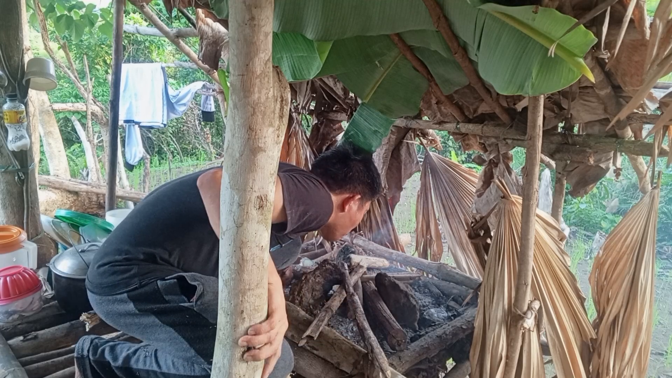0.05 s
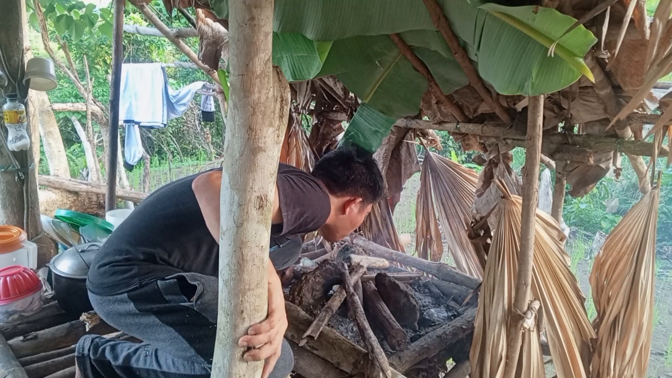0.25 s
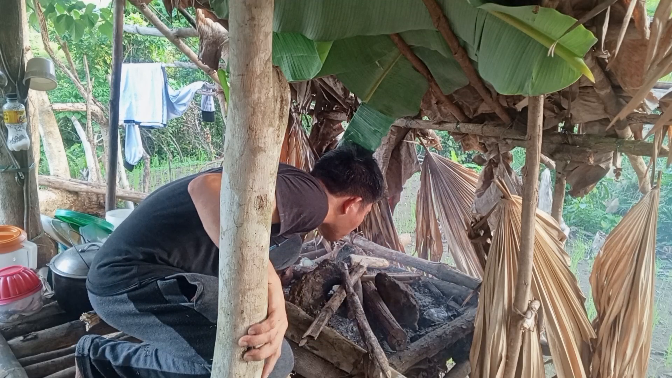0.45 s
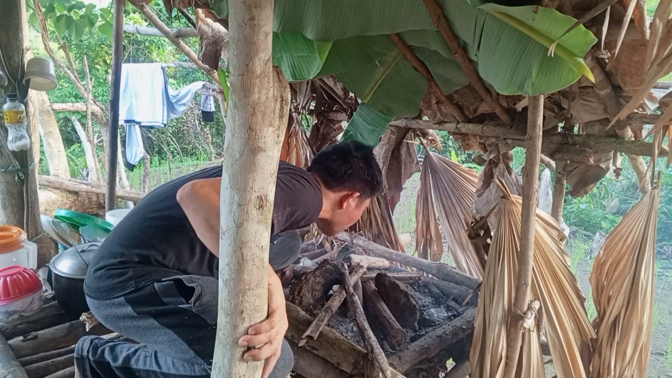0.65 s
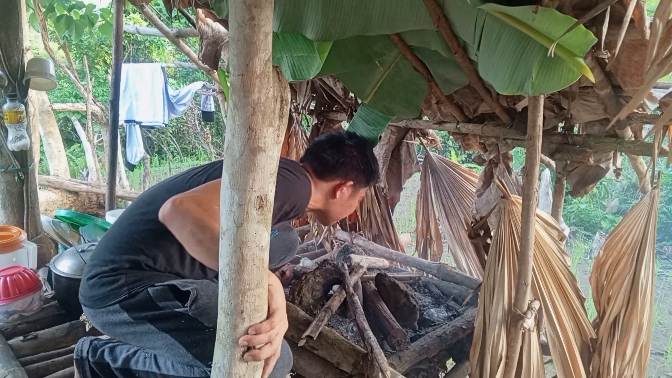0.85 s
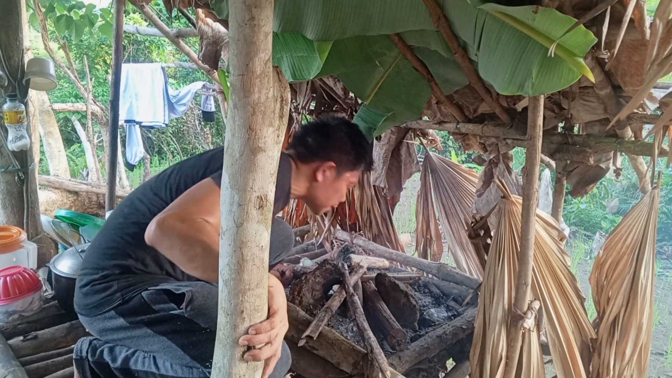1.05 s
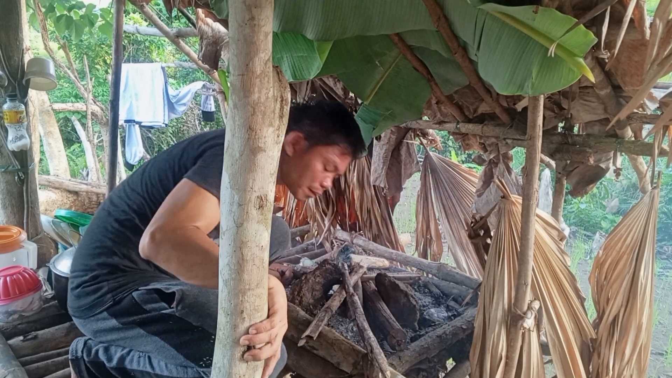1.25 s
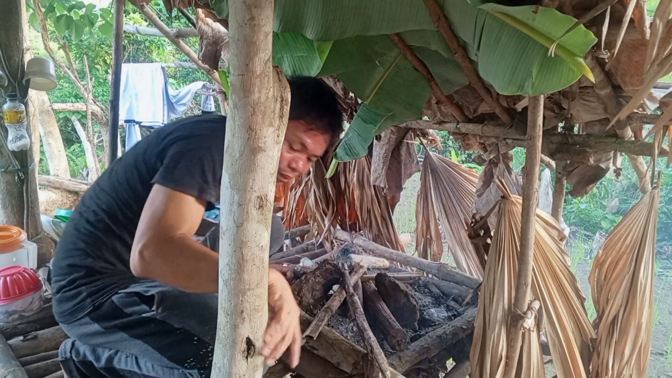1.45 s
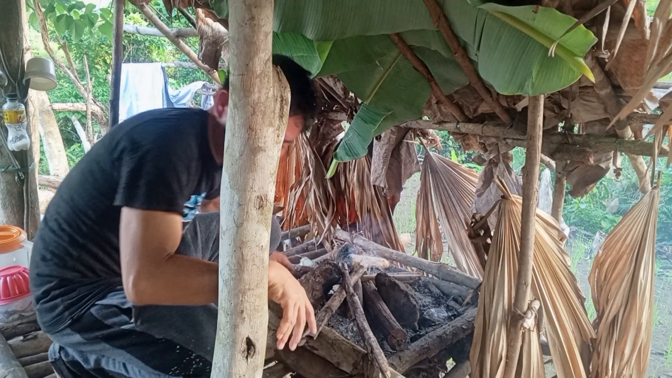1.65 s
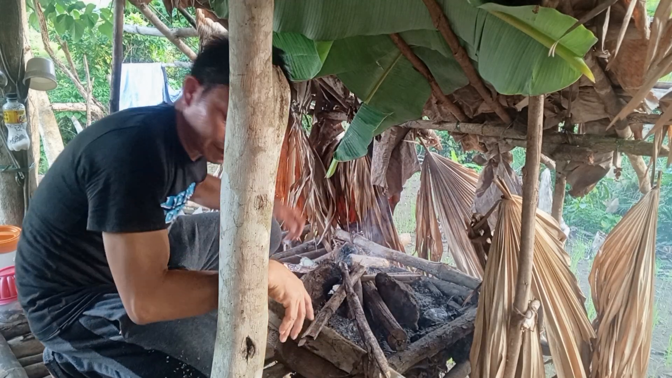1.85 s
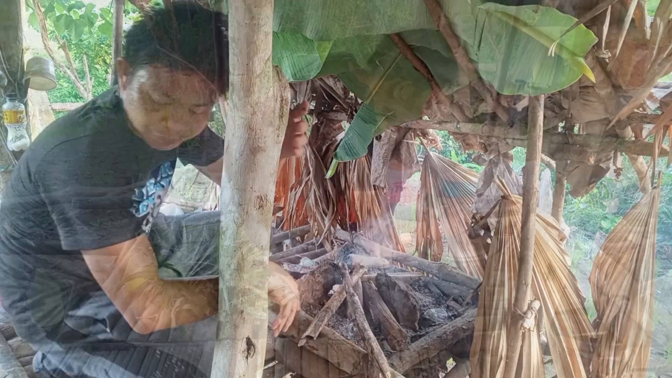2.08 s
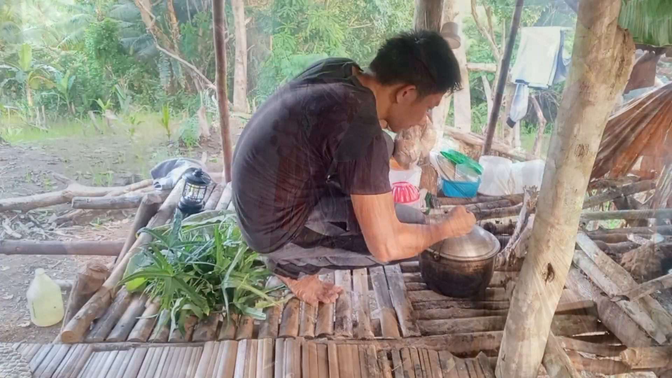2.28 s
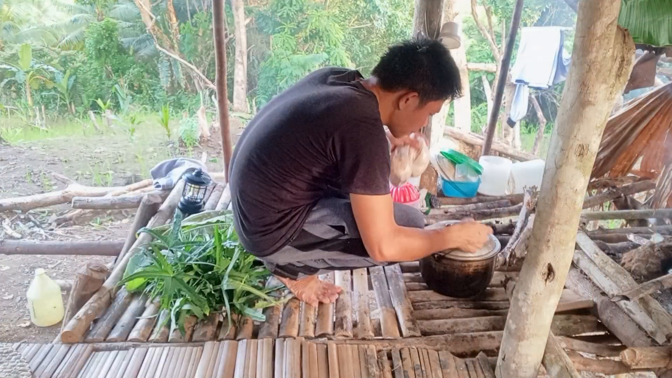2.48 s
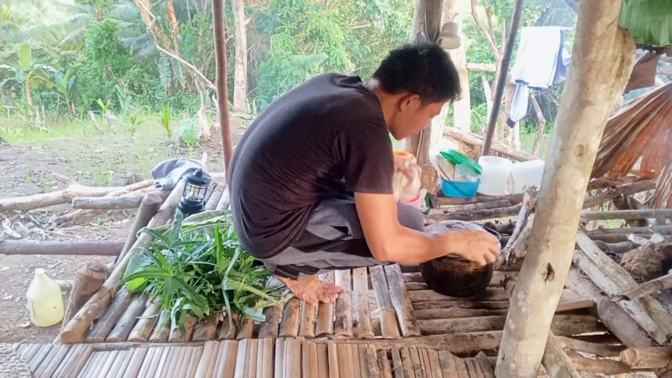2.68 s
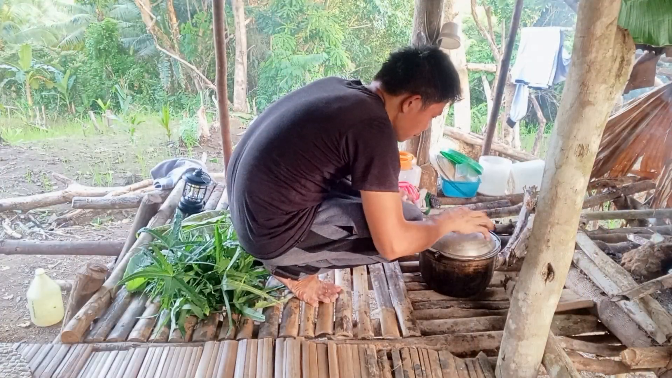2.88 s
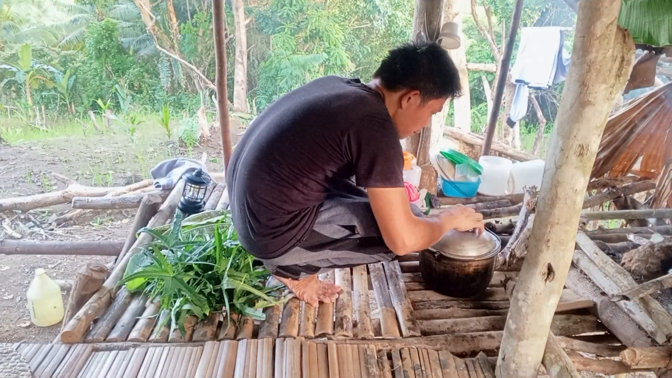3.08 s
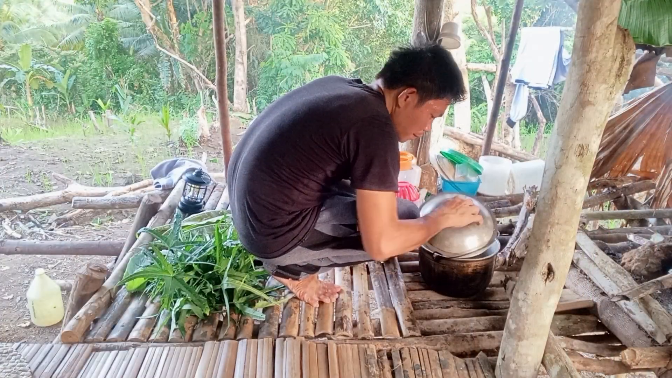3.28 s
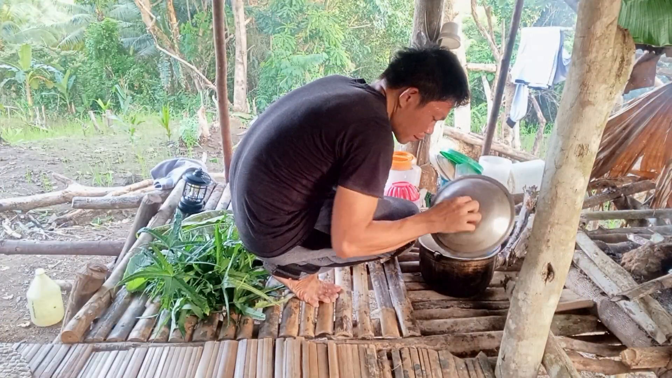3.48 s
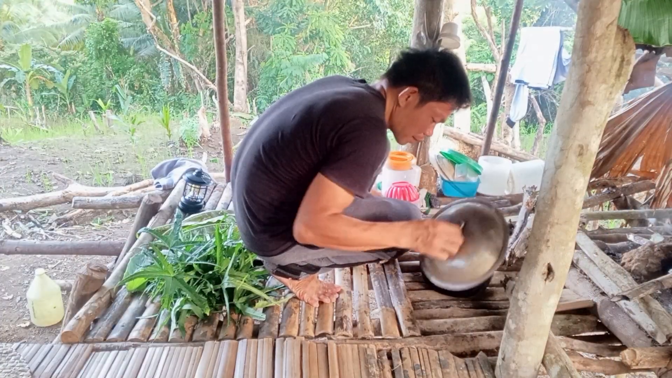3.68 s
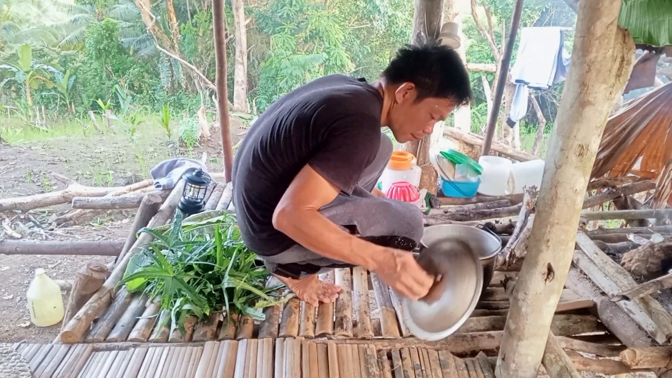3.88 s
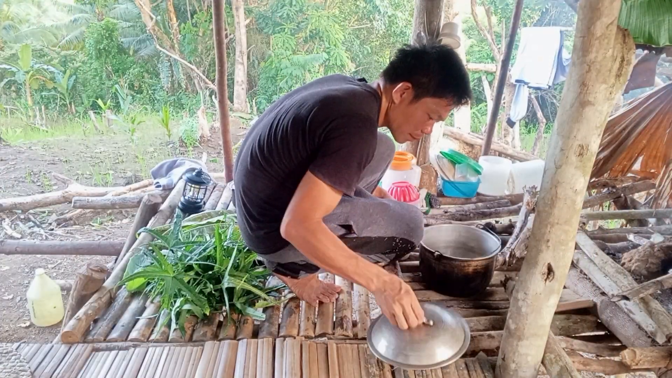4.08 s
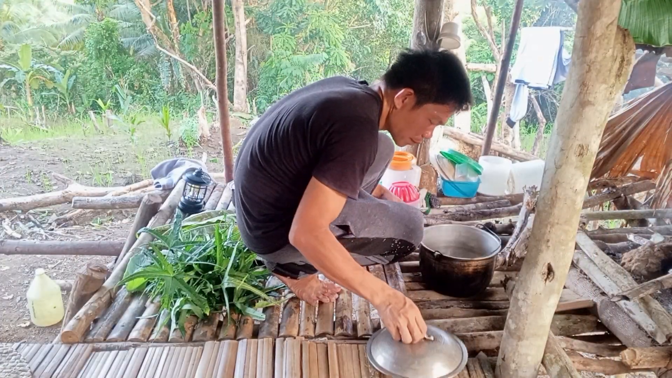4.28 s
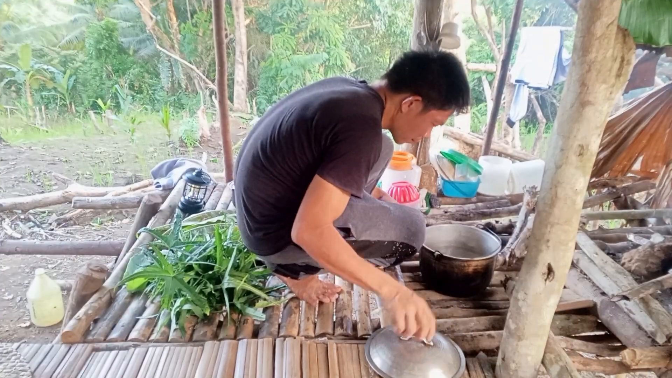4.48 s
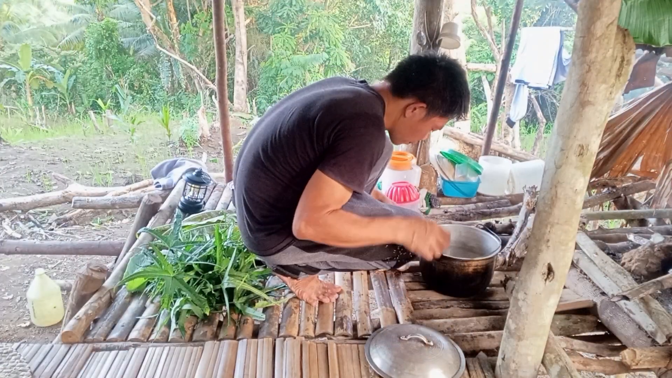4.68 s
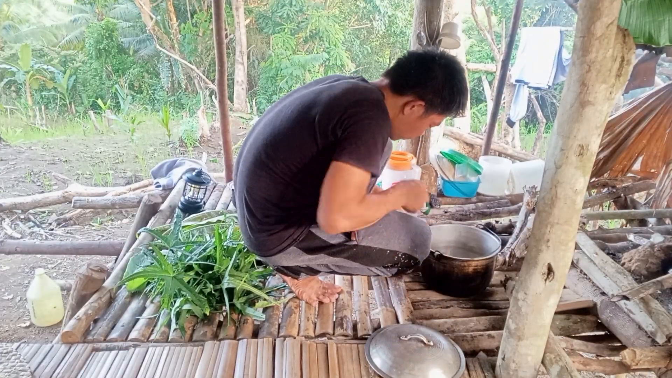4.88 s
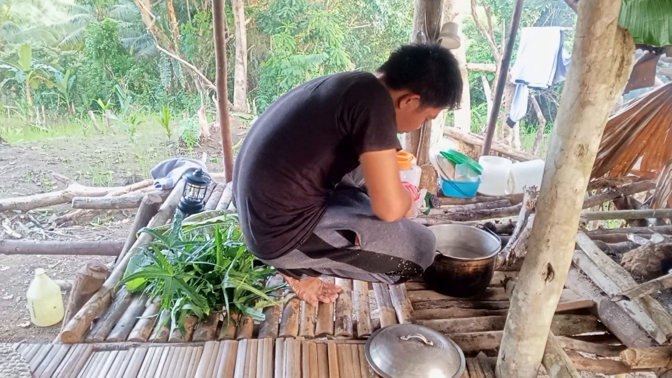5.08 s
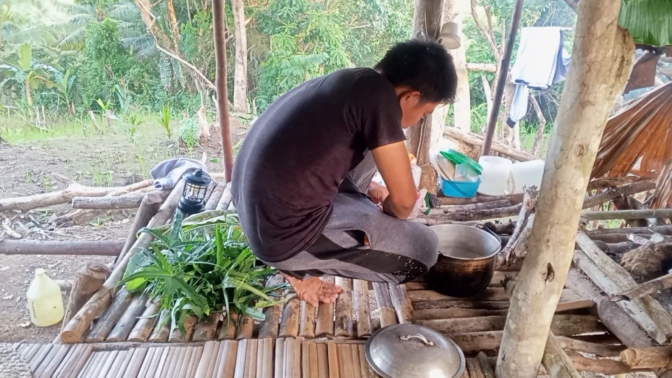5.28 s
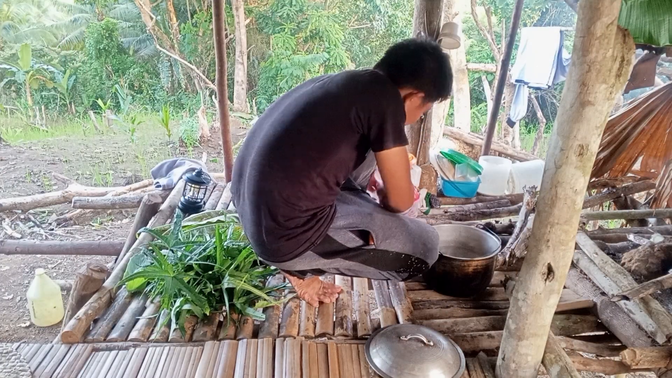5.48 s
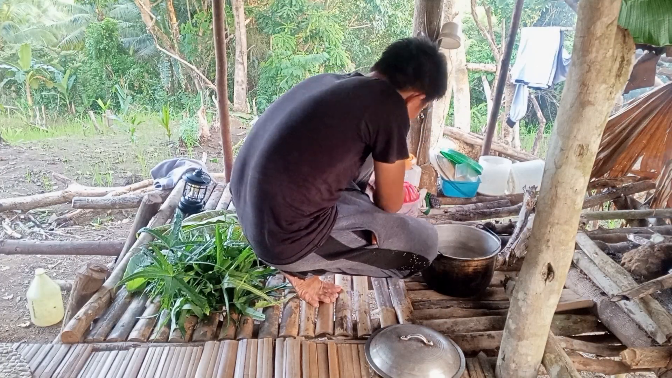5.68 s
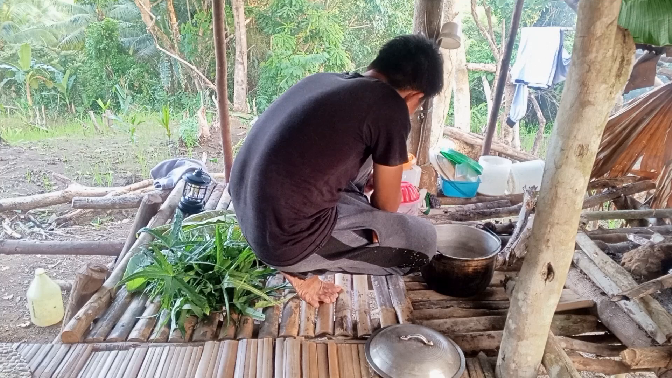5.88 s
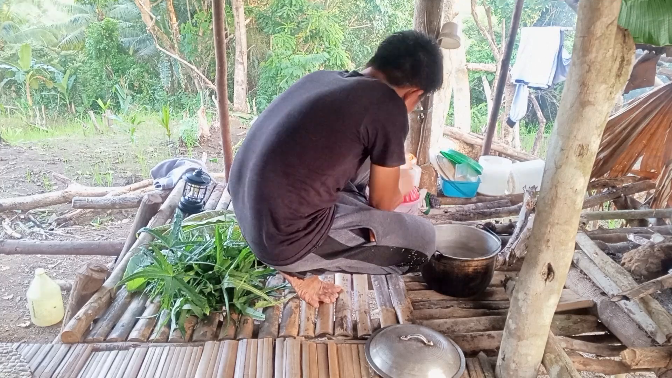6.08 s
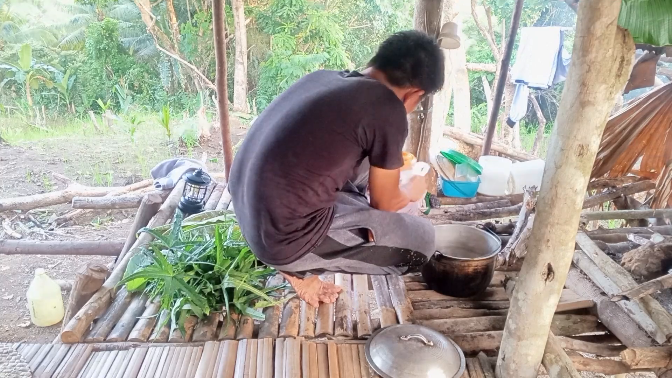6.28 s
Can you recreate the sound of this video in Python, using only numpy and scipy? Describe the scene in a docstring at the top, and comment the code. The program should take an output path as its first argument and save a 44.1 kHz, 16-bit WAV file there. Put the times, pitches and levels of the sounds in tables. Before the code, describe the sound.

A steel pot is set down in a small open forest hut, its lid scrapes and rings, then clatters onto slats amid shrill insects.

```python
"""Insects hiss steadily in the trees around an open forest hut while clothes and hands rustle and bamboo knocks.
Close by, a steel pot is put down; its lid scrapes over the rim, rings in the hand and is laid on the slatted floor.
Steel blows are noise bursts through broad resonances plus dying sine modes; bamboo is the bursts alone.
Insects, air and rubbing are coloured noise, and a small creature's clucks are rounded sine pulses.
The hut adds a short scatter; the microphone loses the deep bass and the top of the treble."""
import sys
import numpy as np
from scipy import signal
from scipy.fft import rfft, irfft
from scipy.io import wavfile
from scipy.ndimage import map_coordinates

SR = 44100
rng = np.random.default_rng(int(sys.argv[2]) if len(sys.argv) > 2 else 0)


def waveform_to_disk(signal):
    """Save audio, clipped to [-1, 1], as 16-bit WAV at the path in sys.argv[1]."""
    frames = np.transpose(np.atleast_2d(signal))
    scaled = np.clip(frames, -1, 1) * 32767
    samples = np.round(scaled).astype(np.int16)
    wavfile.write(sys.argv[1], SR, samples)


N = 279698
TIME = np.arange(N) / SR

# low outdoor air in the forest: (frequency [Hz], relative density [dB per Hz])
FOREST_SPECTRUM = [(20, -35), (40, -16), (65, -8), (105, 3), (170, -3.5), (260, -8.5), (500, -12),
                   (1100, -17), (2000, -18.5), (3500, -19.5), (6500, -24.5), (10000, -27.5), (13000, -41),
                   (16000, -45)]
# insects in the trees: (frequency [Hz], relative density [dB per Hz])
INSECT_SPECTRUM = [(6000, -58), (6900, -19), (7400, 0), (7800, -3), (8250, 3.5), (8600, 0), (9000, -16),
                   (9900, -27.5), (11050, -4.5), (11800, -19.5), (13500, -47)]
FOREST_DB, INSECTS_DB = -58, -57.5
# clucks of a small creature: (time [s], level [dB])
CLUCKS = [(2.572, -46), (2.710, -54), (3.795, -43), (3.806, -45.5), (4.076, -41.5), (4.086, -50),
          (4.269, -44), (5.824, -44.5)]

# dull part of rubbing cloth and hands: (frequency [Hz], relative density [dB per Hz])
SHUFFLE_SPECTRUM = [(40, -22), (110, -0.5), (250, 2), (470, -5), (680, 1.5), (1200, -6.5), (3000, -9),
                    (6000, -15.5), (14000, -33)]
# bright part of the same rubbing: (frequency [Hz], relative density [dB per Hz])
RUSTLE_SPECTRUM = [(100, -38), (450, -10), (900, -7), (1700, -4.5), (2500, -3), (4500, -3), (6500, -3.5),
                   (9000, -2), (10700, 3.5), (12000, -3), (13500, -12), (16000, -22)]
# strokes of a hand or sleeve: (start [s], length [s], rustle [dB], shuffle relative to the rustle [dB])
STROKES = [(-.17, 0.77, -56.5, 4), (1.335, .17, -56.5, -6), (1.64, 0.26, -65.5, 3), (2.34, .29, -55, -17),
           (2.888, .12, -59, -14), (3.68, 0.12, -62, -16), (3.88, 0.48, -53.5, -15), (4.02, 0.11, -53, -20),
           (4.595, 0.17, -48.5, -11), (4.797, 0.2, -55, -7), (5.0, 0.092, -50.5, -18),
           (5.283, 0.28, -46.5, -10), (5.699, 0.13, -43.5, -20), (5.85, 0.14, -45, -14),
           (6.2, 0.091, -41, -16.5)]
STROKE_SKEW, STROKE_POWER = 1.05, 0.55  # fastest a little after midway; loudness follows speed
# spells of steady rubbing, each lasting until the next: (start [s], rustle [dB])
RUBBING_SPELLS = [(0, -78), (2.1, -62.5), (2.7, -70), (2.95, -63), (3.1, -59.5), (4.595, -51.5),
                  (5.53, -54), (6.2, -49)]
SPELL_FADE_S, SPELL_SHUFFLE_DB = .022, -15  # shuffle relative to the rustle

# centres of thud, knock, clank, clash and sizzle: (frequency [Hz])
COLOUR_HZ = [200, 750, 2000, 4800, 10000]
# colour shared by every blow, falling away at both ends: (frequency [Hz], gain [dB])
BLOW_COLOUR = [(30, -27), (70, -13.5), (150, 3.5), (400, 1), (5500, 3.5), (7800, 0.5), (11000, 5),
               (13000, -4), (16000, -28)]
# light knocks and scuffs on wood and bamboo, levels relative: (time [s], scrape length [s], thud [dB],
# peak level [dB], peak centre [Hz], fall to both sides [dB per octave])
KNOCKS = [(1.106, 0.018, -52, -51.5, 5500, 4), (1.195, 0.046, -55, -48, 3200, 9),
          (1.581, .016, -38, -31, 746, 4.5), (1.63, .004, -52, -44, 900, 6.5),
          (2.243, .003, -33, -37, 2000, 10), (2.873, .005, -39, -46.5, 3000, 3.5),
          (3.085, 0.022, -33, -42.5, 2000, 7.5), (3.193, .006, -31, -39, 600, 10),
          (4.205, 0.0048, -50, -35, 1400, 10.5), (4.501, .003, -26, -36, 800, 4.5),
          (4.543, .0045, -25.5, -45, 500, 4.5), (4.82, .004, -56, -36.5, 2200, 2.5),
          (5.608, 0.0031, -37, -32.5, 3940, 7), (6.247, 0.0068, -39, -36, 10000, 1.7)]
# broad resonances of the floor slats: (frequency [Hz], height [dB])
SLAT_RESONANCES = [(160, 3.4), (520, 5.7), (850, 2), (1400, 8.5), (1800, 3.1), (2800, 2.8), (3900, 4.5)]
KNOCK_T60_S = 0.055  # the slats are dead

# free ring of the pot: (frequency [Hz], relative level [dB], t60 [s])
POT_MODES = [(974, -32, .32), (1098, -41, .48), (1528, -44, .4), (1593, -40.5, .52), (2169, -52, .7),
             (2729, -44, .45), (2777, -44.5, .48), (2309, -48, .35), (2600, -47, .35), (3106, -50, .3),
             (3262, -45, .26), (3536, -48, .3), (3676, -48, .3), (4102, -48, .35), (5044, -48, .32),
             (5222, -51, .4), (5824, -51, .35), (5916, -46, .22), (6465, -44, .2), (7413, -49, .25),
             (9722, -45, .18), (10270, -46, .18)]
# free ring of the lid: (frequency [Hz], relative level [dB], t60 [s])
LID_MODES = [(398, -53, 2.2), (780, -60, .6), (1136, -56, 2.1), (2178, -38.5, 1.25), (2616, -53, .5),
             (3483, -42, .33), (4996, -34, .15), (6616, -37, .21), (415, -43, .17), (662, -43, .14),
             (845, -45, .12), (1200, -49, .2), (1500, -49, .3), (2172, -42, .3), (2325, -51, .25),
             (2785, -48, .4), (3165, -48, .2), (3289, -56, .6), (3865, -44, .12), (4441, -48, .15),
             (4581, -47, .18), (5136, -45, .2), (5447, -41, .12), (6105, -46, .1), (7924, -48, .1),
             (9184, -41, .08), (10090, -40, .1)]
# sprung floor under the dropped lid: (frequency [Hz], level [dB], t60 [s])
FLOOR_MODES = [(88.5, -47, .5), (122.4, -46, 0.44), (160.5, -51, 0.44), (256, -54, .3), (347, -44, 0.37)]

# fingers tick on the carried lid, levels relative: (time [s], tick [dB], lid ring [dB])
FINGER_TAPS = [(3.643, -44.5, -17), (3.68, -45, -21), (3.714, -45, -19)]
# soft fingers wake the low modes, thud to sizzle: (relative level [dB])
TAP_RING_COLOUR_DB = [-11, 0, -12, -30, -38]
# broad resonances of the lid in the hand: (frequency [Hz], height [dB])
TAP_RESONANCES = [(1450, 10), (2750, 7)]
TAP_SCRAPE_S, TAP_THUD_DB, TAP_CENTRE_HZ, TAP_FALL_DB_PER_OCTAVE = 0.0028, -45, 2500, 4.0

# the lid meets the floor, levels relative: (time [s], scrape length [s], clatter t60 [s], thud [dB], knock [dB],
# clank [dB], clash [dB], sizzle [dB], lid ring [dB], share of the free ring time [1])
LID_ON_FLOOR = [(4.394, 0.0018, 0.035, -33, -30, -22.5, -22, -43, -4.5, 0.32),
                (4.408, 0.0027, 0.12, -23.5, -25, -14.5, -31, -50, -0.5, 0.87),
                (4.4405, 0.0015, 0.017, -26, -15, -12, -2.5, -26, -14, 0.6),
                (4.4439, 0.0066, 0.068, -21.5, -14.5, -21.5, -17, -33.5, -13, 0.79),
                (4.4818, 0.001, 0.043, -21, -21.5, -27, -21, -48, -20, 0.3)]
# broad resonances of lid and floor in contact: (frequency [Hz], height [dB])
LID_AND_FLOOR = [(158, 9.2), (342, 7), (413, 10.5), (550, 5.4), (658, 10.6), (847, 7.6), (1198, 9.2),
                 (1851, 4.6), (2178, 12.6), (2343, 6.4), (2800, 11), (3302, 6.6), (4579, 9.1), (5039, 6.4),
                 (5674, 2.1), (6614, 2.1), (7703, 7.5), (11082, 9.4)]
LID_RESTS_S, RESTING_T60_S = 4.482, 0.041  # lying flat on the floor, the lid is muted

# the lid hits the rim, levels relative: (time [s], scrape length [s], clatter t60 [s], thud [dB], knock [dB],
# clank [dB], clash [dB], sizzle [dB], pot ring [dB], lid ring [dB], share of the free ring time [1])
LID_ON_RIM = [(2.9338, 0.0037, 0.087, -26, -30, -37.5, -22, -22, -4, -17, 0.2),
              (2.974, 0.002, 0.13, -26, -44, -43, -30.5, -38, -10, -20, 0.35),
              (3.1086, 0.0042, 0.054, -29, -26.5, -37.5, -41, -42.5, -24, -28, 0.24),
              (3.215, 0.0044, 0.096, -44, -45, -41, -27.5, -36, -23, -19, 0.76),
              (3.221, 0.0073, 0.094, -17.5, -22.5, -26.5, -32.5, -50, -4.5, -20, 0.92),
              (3.2647, 0.0047, 0.13, -20.5, -35, -28, -23, -23, -15, 1, 0.93),
              (3.297, 0.02, 0.25, -36, -32, -42, -28.5, -43, -25, -11, 0.36),
              (3.325, 0.0066, 0.088, -21, -15, -22, -34.5, -37.5, -19, -0.5, 0.97),
              (3.351, 0.005, 0.1, -32, -23, -31, -37, -36.5, -27, -12, 0.72),
              (3.386, 0.014, 0.056, -43, -41, -37, -22.5, -33, -18, 0.5, 0.79),
              (3.4844, 0.0083, 0.05, -33, -30, -34, -13.5, -19, 0.5, -16, 0.47),
              (3.526, 0.0051, 0.071, -36, -35, -41, -24, -33.5, -11, -11, 0.34)]
# broad resonances of lid and rim in contact: (frequency [Hz], height [dB])
LID_AND_RIM = [(288, 8.4), (401, 4.7), (490, 6.3), (600, 4.7), (694, 5.6), (1006, 3), (1133, 1.2),
               (1312, 4), (1498, 6.7), (1619, 2.8), (1735, 5.4), (2176, 15.6), (2430, 2.4), (2628, 9.3),
               (3341, 11.6), (3777, 10.5), (4455, 5.6), (5438, 3.7), (5789, 8.5), (6620, 9.5), (7364, 8.1),
               (8315, 2.6), (9133, 3.3), (9758, 9.4), (11137, 5.4)]

# the pot is put down, levels relative: (time [s], scrape length [s], clatter t60 [s], thud [dB], knock [dB],
# clank [dB], clash [dB], sizzle [dB], pot ring [dB], share of the free ring time [1])
POT_DOWN = [(2.067, 0.002, 0.084, -46, -58, -48, -37.5, -35, -33, 0.34),
            (2.0902, 0.0038, 0.053, -15, -23, -26.5, -34, -35, -6, 0.59),
            (2.0969, 0.016, 0.087, -23.5, -21.5, -22, -23.5, -29.5, -1.5, 0.97),
            (2.354, 0.0028, 0.082, -22, -29, -30, -47, -53, -15, 0.96),
            (2.665, 0.0068, 0.057, -38, -45, -44.5, -53.5, -47.5, -17, 0.32)]
# broad resonances of pot and ground in contact: (frequency [Hz], height [dB])
POT_AND_GROUND = [(155, 7), (233, 7.5), (418, 2.5), (545, 3), (700, 9.5), (952, 13.5), (1504, 8),
                  (1723, 11), (2176, 11.5), (2430, 7.5), (2612, 5), (3491, 13.5), (4963, 7), (5765, 11),
                  (6102, -2), (6634, 10), (9817, 6.5), (10758, -1)]

CUTOFF_HZ = 15800


def from_db(db):
    """Turns decibels into an amplitude factor."""
    return 10 ** (np.asarray(db) / 20)


def rms_one(x):
    """Scales a signal to rms 1."""
    return x / np.sqrt(np.mean(x ** 2) + 1e-20)


def at_hz(points, hz):
    """A spectrum in dB, read on a log-frequency axis."""
    points = np.array(points)
    return np.interp(np.log(np.maximum(hz, 1)), np.log(points[:, 0]), points[:, 1])


def dying(t, t60):
    """An envelope that loses 60 dB in t60."""
    return np.exp(-np.log(1000) * t / np.maximum(t60, 1e-3))


def add(out, s, sound):
    """Mixes a sound in from a given time."""
    start = int(round(s * SR))
    out[start:start + len(sound)] += sound[:N - start]


def wander(axis, step):
    """Smooth chance along an axis, with a new value at every step; rms 1."""
    knots = axis / step
    values = rng.standard_normal(int(knots[-1]) + 2)
    return rms_one(map_coordinates(values, [knots], order=2, mode="nearest"))


def noise(spectrum):
    """Steady noise of a given colour; rms 1."""
    gain = from_db(at_hz(spectrum, np.fft.rfftfreq(N, 1 / SR)))
    return rms_one(irfft(rfft(rng.standard_normal(N)) * gain, N))


def causal_filter(x, gain_db):
    """Minimum-phase filter: its peaks ring after a blow, never before."""
    cepstrum = irfft(np.log(from_db(gain_db)))
    half = len(cepstrum) // 2
    cepstrum[1:half] *= 2
    cepstrum[half + 1:] = 0
    return irfft(rfft(x) * np.exp(rfft(cepstrum)))


def body(resonances, hz, width_hz):
    """Gain in dB of a few broad resonances, wider towards the treble."""
    peaks_db = 0
    for centre, height_db in resonances:
        width = width_hz * np.sqrt(centre / SR)
        peaks_db = peaks_db + height_db / (1 + ((hz - centre) / width) ** 2)
    return peaks_db + at_hz(BLOW_COLOUR, hz)


def contact(thud_db, level_db, centre_hz, fall_db):
    """Levels from thud to sizzle: a thud, and a broad peak that lies higher for a harder contact."""
    octaves = np.abs(np.log2(np.array(COLOUR_HZ[1:]) / centre_hz))
    return [thud_db, *(level_db - fall_db * octaves)]


def clatter(rows, resonances, crack, width_hz, ripple_db, grain_db, ripple_hz=120, size=16384):
    """Each blow is a crack, then short modes that are fed while the surfaces scrape and die once they part."""
    out, t, hz = np.zeros(N), TIME[:size], np.fft.rfftfreq(size, 1 / SR)
    body_db = body(resonances, hz, width_hz)
    for s, scrape, t60, *levels in rows:
        envelope = dying(np.maximum(t - scrape, 0), t60)
        burst = envelope * rng.standard_normal(size) * from_db(grain_db * wander(t, 0.00203))
        burst[0] += crack
        burst *= np.linalg.norm(envelope) / np.linalg.norm(burst)
        # every point of contact favours other ones among the crowded high modes
        ripple = ripple_db * wander(hz, ripple_hz) * hz / (hz + 1500)
        spot_db = 20 * np.log10(rms_one(from_db(ripple)))
        colour_db = at_hz(list(zip(COLOUR_HZ, levels)), hz)
        add(out, s, causal_filter(burst, body_db + spot_db + colour_db))
    return out


def ring(modes, s, ring_db, colour_db, free_share, twin_db, split_hz=3.8, colour_share=0.87, spread_db=0.0):
    """One blow on a set of modes: a dull blow wakes the low ones, and a touching hand or rim shortens them all."""
    out = np.zeros(N)
    colour = list(zip(COLOUR_HZ, colour_share * (np.array(colour_db) - max(colour_db))))
    for hz, mode_db, t60 in modes:
        t = TIME[:int(t60 * np.clip(free_share, .05, 2) * SR) + 1]
        strength_db = ring_db + mode_db + at_hz(colour, hz) + spread_db * rng.standard_normal()
        # each blow adds to the swing that the mode already has
        phase = 2 * np.pi * hz * (s + t)
        # the steel is not quite round, so each mode has a close twin that beats with it
        pair = np.sin(phase) + from_db(twin_db) * np.sin(phase + 2 * np.pi * split_hz * t)
        add(out, s, from_db(strength_db) * pair * dying(t, t60 * free_share))
    return out


def forest(flutter_db=0.66):
    """Low outdoor air, and a chorus of insects merged into a shrill, fluttering band."""
    chorus = noise(INSECT_SPECTRUM) * from_db(INSECTS_DB + flutter_db * wander(TIME, 0.023))
    return from_db(FOREST_DB) * noise(FOREST_SPECTRUM) + chorus


def clucks(pitch_hz=700, length_s=0.0094):
    """Each cluck is a rounded pulse of a few cycles."""
    out, t = np.zeros(N), TIME[:int(length_s * SR)]
    swell = np.sin(np.pi * np.sqrt(t / length_s)) ** 2
    for s, level_db in CLUCKS:
        add(out, s, from_db(level_db) * swell * np.sin(2 * np.pi * pitch_hz * t))
    return out


def stroke(start, length):
    """Loudness of one stroke: the hand speeds up and slows to a stop."""
    progress = np.clip((TIME - start) / length, 0, 1)
    return np.abs(np.sin(np.pi * progress ** STROKE_SKEW)) ** STROKE_POWER


def movement(grain_db=1.5, sway_db=0.55):
    """Strokes over steady rubbing, each a dull shuffle and a bright rustle, made uneven by catching fibres."""
    steady_db = np.full(N, float(RUBBING_SPELLS[0][1]))
    for start, level_db in RUBBING_SPELLS[1:]:
        steady_db += (level_db - steady_db) * np.clip((TIME - start) / SPELL_FADE_S, 0, 1)
    rustle_power = from_db(steady_db + sway_db * wander(TIME, .05)) ** 2
    shuffle_power = rustle_power * from_db(SPELL_SHUFFLE_DB) ** 2
    for start, length, level_db, shuffle_db in STROKES:
        power = (from_db(level_db) * stroke(start, length)) ** 2
        rustle_power += power
        shuffle_power += power * from_db(shuffle_db) ** 2
    grain = rms_one(from_db(grain_db * wander(TIME, .003)))
    shuffle = np.sqrt(shuffle_power) * noise(SHUFFLE_SPECTRUM)
    rustle = np.sqrt(rustle_power) * noise(RUSTLE_SPECTRUM)
    return grain * (shuffle + rustle)


def bamboo(gain_db=-1.0):
    """Light knocks of the floor slats and of things being handled: short bursts without a long ring."""
    rows = [(s, scrape, KNOCK_T60_S, *contact(*blow)) for s, scrape, *blow in KNOCKS]
    knocks = clatter(rows, SLAT_RESONANCES, crack=3.6, width_hz=350, ripple_db=4.5, grain_db=-1.0)
    return from_db(gain_db) * knocks


def floor_boom():
    """The flat drop of the lid leaves a short wooden boom in the slats."""
    t = TIME[:SR // 2]
    # the drop is the floor contact with the loudest single band
    drop_s = max(LID_ON_FLOOR, key=lambda row: max(row[3:8]))[0]
    out = np.zeros(N)
    for hz, mode_db, t60 in FLOOR_MODES:
        add(out, drop_s, from_db(mode_db) * np.sin(2 * np.pi * hz * t) * dying(t, t60))
    return out


def lid_carried(tick_t60=.033, free_share=0.8):
    """Fingers tick on the lifted lid and keep its low modes singing."""
    rings, ticks = np.zeros(N), []
    for s, tick_db, lid_db in FINGER_TAPS:
        rings += ring(LID_MODES, s, lid_db, TAP_RING_COLOUR_DB, free_share, twin_db=-29)
        levels = contact(TAP_THUD_DB, tick_db, TAP_CENTRE_HZ, TAP_FALL_DB_PER_OCTAVE)
        ticks.append((s, TAP_SCRAPE_S, tick_t60, *levels))
    return rings + clatter(ticks, TAP_RESONANCES, crack=3.6, width_hz=280, ripple_db=5.0, grain_db=3.0)


def lid_laid_down():
    """Quick contacts with the floor ring the lid, until lying flat on the bamboo mutes it."""
    rings = np.zeros(N)
    for s, _, _, *colour_db, lid_db, share in LID_ON_FLOOR:
        rings += ring(LID_MODES, s, lid_db + 1.5, colour_db, share, twin_db=-8.5, colour_share=0.69)
    rings *= dying(np.maximum(TIME - LID_RESTS_S, 0), RESTING_T60_S)
    blows = clatter(LID_ON_FLOOR, LID_AND_FLOOR, crack=6.1, width_hz=190, ripple_db=3.0, grain_db=3.5)
    return rings + from_db(-5) * blows


def lid_lifted(choke=0.33):
    """The lid catches and scrapes on the rim; both pieces of steel ring."""
    rings = np.zeros(N)
    for s, _, _, *colour_db, pot_db, lid_db, share in LID_ON_RIM:
        # a firm touch chokes part of the ring that is still sounding
        rings *= np.where(TIME < s, 1, np.clip(share, .05, 1) ** choke)
        rings += ring(POT_MODES, s, pot_db, colour_db, share, twin_db=-25)
        rings += ring(LID_MODES, s, lid_db, colour_db, share, twin_db=-13)
    blows = clatter(LID_ON_RIM, LID_AND_RIM, crack=3.9, width_hz=230, ripple_db=4.5, grain_db=2.5)
    return rings + from_db(-5) * blows


def pot_put_down():
    """The pot lands, grinds briefly on its base and rings on."""
    rings = np.zeros(N)
    for s, _, _, *colour_db, pot_db, share in POT_DOWN:
        rings += ring(POT_MODES, s, pot_db - 2, colour_db, share, twin_db=-33)
    blows = clatter(POT_DOWN, POT_AND_GROUND, crack=4, width_hz=264, ripple_db=3.0, grain_db=1.5)
    return rings + from_db(-5) * blows


def hut(x, t60=0.22, wet_db=-19, dull_hz=6000):
    """Thatch, posts and floor send back a short, weak scatter."""
    t = TIME[:SR // 2]
    scatter = rng.standard_normal(len(t)) * dying(t, t60) * (t > .008)
    scatter /= np.linalg.norm(scatter)
    scatter = signal.sosfilt(signal.butter(1, dull_hz, fs=SR, output="sos"), scatter)
    return x + from_db(wet_db) * signal.fftconvolve(x, scatter)[:N]


def scene():
    """Steel, floor, bamboo and clucks sound within the hut; rubbing and forest reach the microphone directly."""
    steel = pot_put_down() + lid_lifted() + lid_carried() + lid_laid_down()
    in_hut = hut(steel + floor_boom() + bamboo() + clucks())
    return (in_hut + movement() + forest())[None]


def record(dry):
    """The microphone loses the deep bass, and the top of the treble is cut steeply."""
    thin = signal.sosfilt(signal.butter(3, 42, "high", fs=SR, output="sos"), dry)
    return signal.sosfilt(signal.ellip(10, .1, 80, CUTOFF_HZ, fs=SR, output="sos"), thin)


dry = scene()
out = record(dry)
waveform_to_disk(out)
```